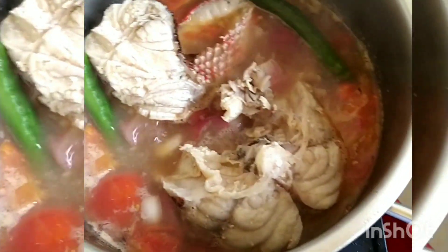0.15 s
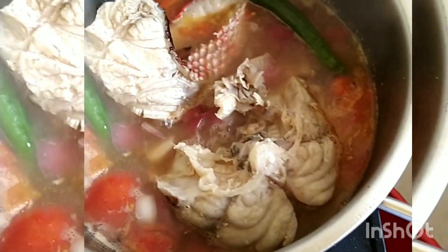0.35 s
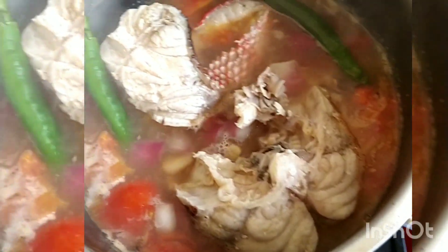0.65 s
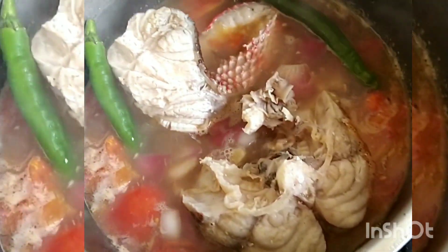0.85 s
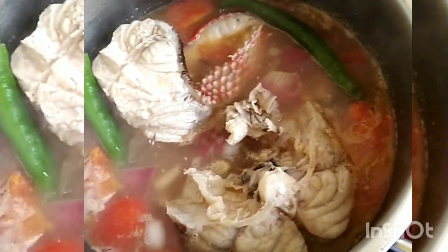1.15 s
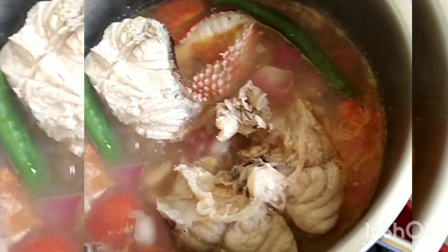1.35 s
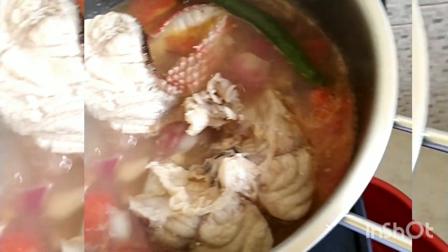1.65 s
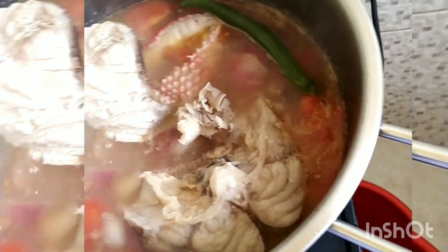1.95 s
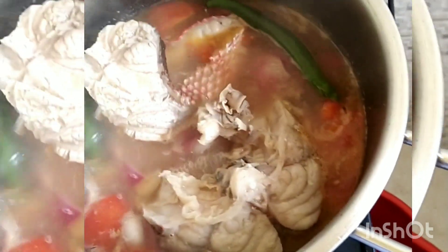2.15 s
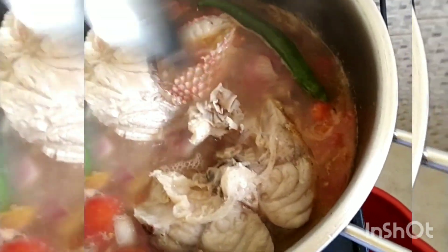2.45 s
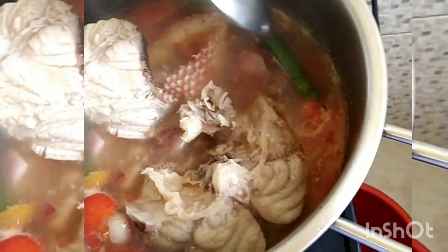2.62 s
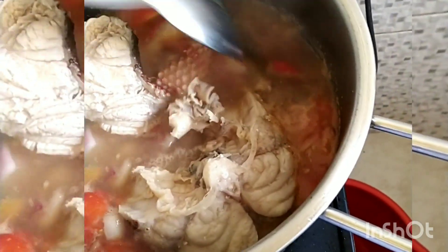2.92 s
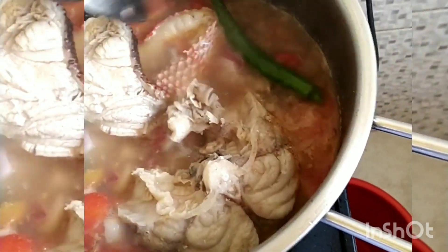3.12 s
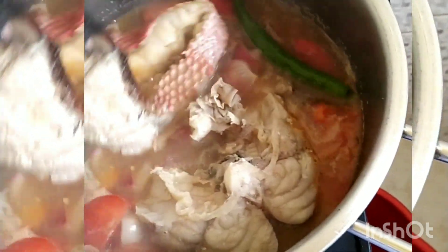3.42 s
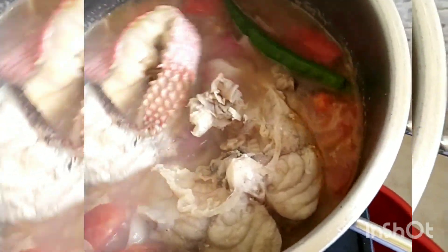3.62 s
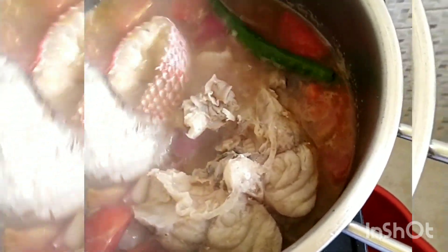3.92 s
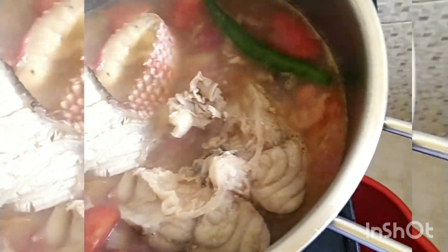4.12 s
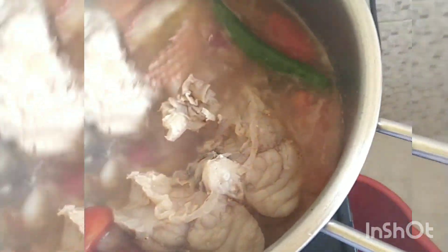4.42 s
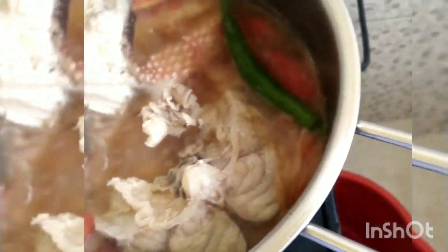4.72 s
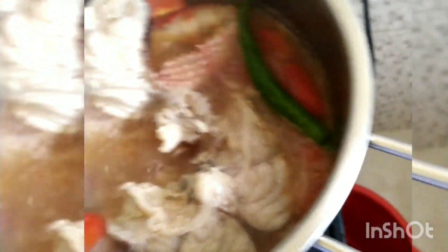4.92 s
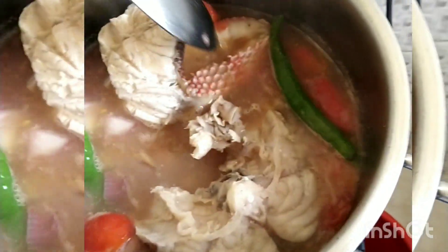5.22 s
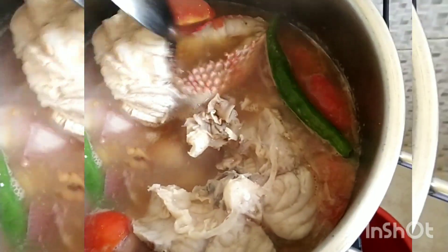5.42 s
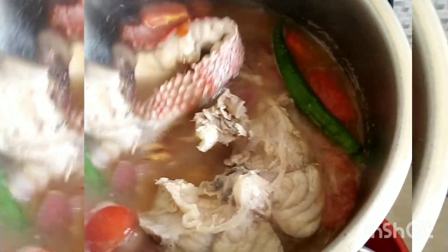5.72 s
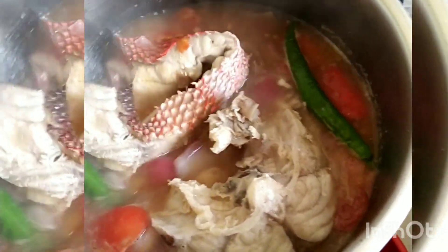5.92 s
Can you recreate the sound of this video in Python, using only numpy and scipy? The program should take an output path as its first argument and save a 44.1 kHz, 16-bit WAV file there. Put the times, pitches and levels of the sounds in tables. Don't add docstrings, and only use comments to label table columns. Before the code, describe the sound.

In a small hard-walled kitchen, a phone an arm or two away picks up a low, faint burner rush, softly bubbling broth and a thin gas hiss throughout. From 0 s bright utensil clinks and dull pot knocks patter, then a loud, clustered lid clang strikes at 0.7 s. Light clinks continue from 1.0 to 1.6 s, followed by a hard spoon blow at 1.65 s, another at 1.94 s, and the heaviest double pan bang at 2.0 s, with a half-second room tail. Between 2.4 and 3.2 s it is quiet, only faint dull taps in the broth. Clinks resume at 3.26 s, with a firm tap at 3.5 s and small ringing tones, through 4.4 s. A big single pot clang hits at 4.6 s. Tiny tinks follow near 5 s, then a sharp clink at 5.26 s and lighter ones until 5.8 s, fading to simmer.

```python
import sys
import numpy as np
from scipy import signal
from scipy.fft import rfft, irfft, next_fast_len
from scipy.io import wavfile
from scipy.ndimage import uniform_filter1d

SR = 44100
rng = np.random.default_rng(int(sys.argv[2]) if len(sys.argv) > 2 else 0)


def volts(x):
    e = np.asarray(x, float) / 20
    return 10 ** e


def generate_wav(signal):
    frames = np.transpose(np.atleast_2d(signal))
    scaled = np.clip(frames, -1, 1) * 32767
    pcm = np.round(scaled).astype(np.int16)
    wavfile.write(sys.argv[1], SR, pcm)


N = 267687
TAIL = 32768
UTENSIL_LAG, POT_LAG = 15, 4
RACK_PAN_DB = 3

# [f/Hz, density/dB per Hz]
LIGHT_STEEL = [(300, -8.5), (1200, -11), (1700, -12), (2100, -2.5), (3200, -8), (5500, -12.5), (7500, 0.5),
               (9800, 6), (12000, -2.5), (14500, -10), (15800, -48.5)]


def unit(x):
    return x / np.sqrt(np.mean(x ** 2) + 1e-20)


def along(points, hz):
    f, v = np.transpose(points)
    return np.interp(np.log(hz + 1), np.log(f + 1), v)


def curve(rows):
    return np.interp(np.arange(N) / SR, *np.transpose(rows))


def pair(mid, side, alike, hz):
    turn = np.arccos(np.clip(along(alike, hz), -1, 1)) / 2
    middle, edge = np.cos(turn) * mid, np.sin(turn) * side
    return np.array([middle + edge, middle - edge])


def noise(gain, alike, patchy_db):
    z = signal.stft(rng.standard_normal((2, N)), nperseg=512)[2]
    patches = uniform_filter1d(rng.standard_normal(z.shape[1:]), 4, 0)
    patches = uniform_filter1d(patches, 10, 1)
    patchy = signal.istft(z * volts(patchy_db * unit(patches)), nperseg=512)[1]
    size = next_fast_len(N + 8192)
    hz = np.fft.rfftfreq(size, 1 / SR)
    mid, side = rfft(patchy, size) * gain(hz)
    return unit(irfft(pair(mid, side, alike, hz), size)[:, :N])


def flame():
    # [t/s, level/dB]
    strength = [(0, -46), (.65, -47.5), (.83, -45), (1.28, -48), (1.5, -47.5), (2.1, -48.5), (2.3, -48.5),
                (3.16, -48.5), (3.55, -47), (3.96, -50), (4.58, -47.5), (5.02, -49.5), (5.7, -48),
                (6.07, -51.5)]
    return curve(strength)


def burner(flame_db):
    # [f/Hz, density/dB per Hz]
    rush = [(15, -81), (25, -46), (57, -14), (178, -7), (271, -9), (300, -7), (884, -11), (1430, -19),
            (1550, -33.5), (1750, -22.5), (2180, -30), (2410, -53), (3000, -54.5), (3900, -69),
            (6600, -120)]
    # [f/Hz, likeness/-1..1]
    rush_alike = [(60, 0.95), (150, 1), (380, 0.8), (940, -0.36), (2370, -0.02), (5940, -0.13),
                  (14900, -0.04)]
    return volts(flame_db - 2.0) * noise(lambda hz: volts(along(rush, hz)), rush_alike, patchy_db=2.0)


def room_boom():
    # [f/Hz, width/Hz, level/dB rms]
    boom = [(71.6, 14, -63), (121.6, 24, -60.5), (172.2, 5.1, -61), (338.7, 16, -62), (479.7, 16, -66.5)]
    out = np.zeros((2, N))
    for centre, width, db in boom:
        out += volts(db) * noise(lambda hz: 1 / (1 + ((hz - centre) / width * 2) ** 2),
                               [(100, 0.93)], patchy_db=-0.5)
    return out


def gas_jet(flame_db):
    # [f/Hz, density/dB per Hz]
    hiss = [(1500, -66), (2200, -19), (4000, -28.5), (7500, -29), (8500, -26), (8900, -9.5), (9800, -3),
            (10700, -13.5), (11200, -29), (14000, -21), (15500, -52)]
    mean_db, swing = -60, 4.9
    level_db = mean_db + swing * (flame_db - flame_db.mean())
    return volts(level_db) * noise(lambda hz: volts(along(hiss, hz)), [(9000, 0.002)], patchy_db=1.5)


def simmer(per_second=60, pitch_hz=550, level_db=-56):
    count = round(per_second * N / SR)
    when = rng.random(count)
    size = np.minimum(rng.exponential(1, count), 3.5)
    side_db = rng.normal(0, 1.4, count)
    hz = pitch_hz * np.exp(.5 * rng.standard_normal((count, 1)))
    cycles = hz * np.arange(2048) / SR
    tones = np.sin(2 * np.pi * cycles * (1 + 0.0068 * cycles))
    pops = tones * np.exp(-cycles / 2.6) * (1 - np.exp(-cycles / 0.7))
    at = (when * N).astype(int)[:, None] + np.arange(2048)
    gains = volts(level_db + 3.2 * size + np.outer([.5, -.5], side_db))
    return np.array([np.bincount(at.ravel(), (g[:, None] * pops).ravel(), N + 2048)[:N] for g in gains])


def causal(gain_db):
    c = irfft(np.log(volts(np.maximum(gain_db, -90))))
    c[1:TAIL // 2] *= 2
    c[TAIL // 2 + 1:] = 0
    return np.exp(rfft(c))


def crack(t60, colour):
    t = np.arange(TAIL) / SR
    burst = rfft(rng.standard_normal(TAIL) * volts(-60 * t / t60))
    size = np.abs(burst)
    chance_db = 20 * np.log10(np.hypot(size, .2 * size.mean()))
    colour_db = along(colour, np.fft.rfftfreq(TAIL, 1 / SR))
    x = irfft(burst * causal(colour_db - chance_db))
    x *= volts(-10 * t / t60)
    return x / np.abs(x).max()


def ring(modes):
    t = np.arange(TAIL) / SR
    onset = 1 - np.exp(-t / 0.001)
    out = np.zeros(TAIL)
    for hz, db, t60 in modes:
        luck, phase = rng.standard_normal(2)
        out += volts(db + 2 * luck - 60 * t / t60) * np.sin(2 * np.pi * hz * t + phase) * onset
    return out


def room():
    # [f/Hz, t60/s]
    decay = [(100, 0.18), (260, 0.66), (700, 0.5), (1840, 0.52), (4850, 0.6), (9000, 0.42), (12800, 0.38)]
    # [f/Hz, likeness/0..1]
    room_alike = [(100, .97), (250, .93), (400, .7), (700, .25), (1500, .15), (15000, 0)]
    hz, t, z = signal.stft(rng.standard_normal((2, TAIL)), SR, nperseg=256)
    fading = z * volts(-60 * t / along(decay, hz)[:, None])
    tail = signal.istft(fading, SR, nperseg=256)[1][:, :TAIL]
    tail = tail * (1 - np.exp(-(np.arange(TAIL) / SR / 0.00071) ** 2))
    return pair(*rfft(tail), room_alike, np.fft.rfftfreq(TAIL, 1 / SR)) / np.linalg.norm(tail[0])


def standing():
    # [f/Hz, level/dB, t60/s]
    room_notes = [(124, -32.5, .5), (172.2, -33.5, 0.6), (274, -36, 0.53), (334.4, -31.5, 0.53),
                  (403.5, -36, .45), (463, -35, 0.44), (551, -34, 0.4)]
    t = np.arange(TAIL) / SR
    return rfft(sum(volts(db - 18.5 - 60 * t / t60) * np.sin(2 * np.pi * hz * t) for hz, db, t60 in room_notes))


def add(out, s, peak_db, pan_db, room_db, x, lag):
    # [f/Hz, level/dB]
    ports = [(100, -3.5), (300, 1.4), (1500, 3.5), (4000, 0.5), (12000, -0.5)]
    hz = np.fft.rfftfreq(TAIL, 1 / SR)
    side = np.array([[.5], [-.5]])
    late = np.array([[max(lag, 0)], [max(-lag, 0)]])
    direct = volts(np.clip(pan_db, -14, 8) * side) * np.exp(-2j * np.pi * hz / SR * late)
    answer = volts(room_db) * (room() + standing())
    heard = irfft(rfft(x) * volts(along(ports, hz) * side) * (direct + answer))
    heard *= np.cos(np.linspace(0, np.pi / 2, TAIL)) ** .5
    start = round(s * SR)
    out[:, start:start + TAIL] += volts(peak_db) * heard


def clinks(out):
    # [t/s, peak/dB, room/dB, brightness/dB]
    clink_events = [(0.0289, -31, 14.5, -2), (0.3341, -29.5, 11, -3.5), (0.475, -37.5, 14, -4.5),
                    (0.626, -35.5, 10.5, -3), (0.9997, -29, 12, -4.5), (1.1657, -34.5, 8.5, -4),
                    (1.3027, -28.5, 8.5, -2.5), (1.3706, -37, 9, -4), (1.469, -42, -5, -4.5),
                    (1.5, -29.5, 9, -5), (1.5954, -27.5, 12, -2), (2.405, -50, 10.5, 1.5),
                    (2.775, -45, 6.5, 9), (2.836, -45, 13, 12), (3.202, -50, 9.5, 11.5),
                    (3.262, -28, 8, -2.6), (3.5253, -42.5, 15, -8), (3.626, -39, 15.5, -7),
                    (3.7237, -30, 4, -6), (3.8515, -36, 8.5, 29), (3.9761, -28, 11.5, -3),
                    (4.202, -34, 11.5, -3.1), (4.2976, -31, 6.5, -3), (4.4113, -38, 16.5, -8),
                    (4.9334, -41.5, -1, 5), (5.2641, -25.5, 7.5, -1.5), (5.443, -32, 7.5, -5),
                    (5.5486, -35.5, 13.5, -5.5), (5.741, -33.5, 4.5, -8.5), (5.7951, -34, 13.5, -3.5)]
    # [f/Hz, level/dB, t60/s]
    clink_modes = [(2081, 3, 0.026), (2490, -10, 0.18), (2840, -20.5, 0.46), (3590, -15, 0.15),
                   (5030, -2, 0.018), (7650, -7.5, 0.016), (9440, -14, 0.039), (10200, -6, 0.084),
                   (13100, -7, .05)]
    body_db, edge_db = -2.5, 0
    hz = np.fft.rfftfreq(TAIL, 1 / SR)
    for s, db, room_db, bright_db in clink_events:
        tilt = [(3500, body_db - bright_db), (5500, 0.0047), (7500, edge_db + bright_db)]
        colour_db = along(LIGHT_STEEL, hz) + along(tilt, hz)
        modes = [(f * (1 + .03 * rng.standard_normal()), level, t60) for f, level, t60 in clink_modes]
        x = crack(.014, np.transpose([hz, colour_db])) + volts(-23) * ring(modes)
        add(out, s, db, RACK_PAN_DB, room_db, x, UTENSIL_LAG)


def dull_contact(pitch_hz, t60):
    # [f/Hz, density/dB per Hz]
    dull = [(150, -31), (500, -7), (1500, -8.5), (2600, -19), (3500, -21.5), (15000, -30.5)]
    return ring([(pitch_hz, 0, t60)]) + volts(5.0) * crack(.5 * t60, dull)


def knocks(out):
    # [t/s, peak/dB, left-right/dB, pitch/Hz]
    knock_events = [(0.111, -35, .1, 1600), (.116, -39.5, 4, 567), (.128, -46.5, 5, 435),
                    (0.131, -32, -1, 1094), (0.201, -29.5, 7, 1030), (.201, -35, 7, 545),
                    (.2, -32, -5, 2760), (.217, -40, -5, 344.4), (.387, -36, 9, 2720), (.44, -57, -3, 760),
                    (1.02, -54, 7, 1920), (1.12, -44, -12, 784), (1.701, -48, 2.5, 124),
                    (1.942, -30, 8, 1134), (2.051, -40.5, 2, 124), (3.66, -46, -5, 2900),
                    (3.396, -43.5, -3, 1267), (4.602, -49.5, 1.5, 167), (5.901, -48.5, 2, 1730),
                    (2.045, -43, 0, 169.6)]
    longest_t60, damped_hz = 0.14, 800
    for s, db, pan_db, pitch in knock_events:
        t60 = longest_t60 / (1 + (pitch / damped_hz) ** 2)
        add(out, s, db, pan_db, 6.5, dull_contact(pitch, t60), POT_LAG)


def blows(out):
    # [t/s, peak/dB, left-right/dB, crack t60/s]
    blow_events = [(0.6872, -2.5, 0, 0.026), (0.6901, -6, 11.5, 0.0066), (0.6947, -4, 7, 0.015),
                   (.7074, -7, 7, 0.053), (1.5646, -22, -12.5, 0.015), (1.6492, -3, -14, 0.019),
                   (1.6515, -10.5, -9.5, 0.018), (1.9382, -6, -9.5, .007), (2.0101, 2.1, -2, 0.029),
                   (2.0142, -1, -7.5, 0.031), (2.0357, 0.4, 7.5, 0.034), (4.5903, 0.4, 0.7, 0.038)]
    struck = [0, 0, 0, 0, 4, 1, 1, 1, 2, 2, 2, 3]
    # [f/Hz, density/dB per Hz]
    lid = [(88, -49), (150, -56), (300, -14), (653, -8), (800, 4), (1060, -13.5), (1400, -9.5), (2050, 0.5),
           (2700, -11.5), (3900, -6), (5800, -11), (10000, 1.5), (13600, -12), (15300, -71)]
    spoon = [(88, -39), (150, -14.5), (338, -6.5), (373, -15), (470, -2.5), (926, -13), (1210, -7.5),
             (1470, -24.5), (1790, -1.5), (3200, -6.5), (3660, -2.5), (4710, -10), (10000, 0.5),
             (13900, -12.5), (15300, -71)]
    pan = [(47, -62.5), (80, -31), (116, -12.5), (334, -11.5), (690, -5), (919, -19), (1200, -16),
           (1430, -13.5), (2530, -2.5), (3200, -15), (3750, -3), (4450, -17.5), (4900, -11), (10100, -2.5),
           (14000, -18.5), (15300, -54)]
    pot = [(88, -64), (150, -20), (225, -17), (332, -12.5), (508, -3), (549, -1), (706, -8), (824, -5.5),
           (1210, -14), (1310, -7), (2010, -5.5), (3100, -8), (4890, -17), (10000, -10), (13400, -24),
           (15300, -93.5)]
    # [f/Hz, level/dB, t60/s]
    lid_modes = [(803, -3, .09), (1262, -7, .12), (1934, 1, .17), (2107, 3, .17), (2432, -3, .12),
                 (3200, -8, .12), (3748, -9, .15), (4158, -6, .17), (4544, -7, .12), (7105, -7, .14),
                 (7914, -6, .1), (8483, -5, .2), (9697, -3, .12), (10300, -3, .08)]
    spoon_modes = [(466, -8.5, .07), (1214, -1, .08), (1794, -10.5, 0.16), (2480, -7, 0.089),
                   (3531, -8.5, 0.23), (3640, -18.5, .22), (3770, -5, 0.2), (4010, -15.5, 0.16),
                   (5970, 0, 0.074), (6730, -9, 0.025), (7600, 2, .04), (8860, 8, .02), (9450, 5.5, 0.035),
                   (10700, 9.5, 0.031)]
    pan_modes = [(337.5, -12.5, .15), (1180, 1.5, 0.084), (1241, -5.5, 0.13), (1620, -3.5, .12),
                 (2048, -8.5, .03), (2450, -8.5, 0.17), (3686, -4.5, 0.11), (3770, -12, .1),
                 (3900, -7.5, 0.22), (5470, -13, .1), (6670, -9, .08), (7300, -8, .06), (9200, 0, .07),
                 (10150, -3, 0.069)]
    pot_modes = [(342, -13.5, 0.13), (405, -19, 0.18), (476, -22, 0.13), (561.6, -6.5, 0.15),
                 (630, -8, .12), (795, -12.5, 0.25), (1078, -25.5, 0.094), (1158, -0.5, 0.055),
                 (1998, -11.5, 0.14), (2030, -12.5, .1), (2190, -10, 0.093), (2600, -13, 0.082),
                 (3300, -10, 0.085), (2950, -13.5, 0.041)]
    fork_modes = [(7900, -3, .03), (9500, -4, .04), (10400, 0, .04), (12000, 2, .045), (13300, -3, .05)]
    object_room_db = [6, 2, 0.2, -0.6, 5]
    object_ring_db = [-26.5, -25.5, -25.5, -17, -17.5]
    object_lag = [6, 2, 30, -22, 2]
    colours = [lid, spoon, pan, pot, LIGHT_STEEL]
    modes = [lid_modes, spoon_modes, pan_modes, pot_modes, fork_modes]
    for (s, db, pan_db, t60), k in zip(blow_events, struck):
        x = crack(t60, colours[k]) + volts(object_ring_db[k]) * ring(modes[k])
        add(out, s, db, pan_db, object_room_db[k], x, object_lag[k])


def tinks(out):
    # [t/s, peak/dB]
    tink_events = [
        (1.4447, -56),
        (1.4811, -53),
        (4.9331, -57),
        (5.0723, -70),
        (5.1646, -63),
    ]
    # [f/Hz, level/dB, t60/s]
    ladle_modes = [(8700, -8, 0.032), (9200, 9, .05), (10200, -2, 0.058), (12600, -10, .06),
                   (14100, -4.5, .1)]
    for s, db in tink_events:
        add(out, s, db, RACK_PAN_DB, 3, ring(ladle_modes), UTENSIL_LAG)


def taps(out):
    # [t/s, peak/dB, pitch/Hz]
    tap_events = [
        (2.479, -53.5, 660),
        (2.539, -61, 590),
        (2.605, -54.5, 560),
        (2.606, -60, 1014),
        (2.814, -51.5, 930),
        (2.821, -49.5, 514),
        (2.821, -56, 1560),
        (3.165, -57, 653),
        (3.487, -37, 753),
        (3.488, -41, 2020),
    ]
    for s, db, pitch in tap_events:
        add(out, s, db, 0, -6, dull_contact(pitch, .025), POT_LAG)


def pot_tones(out):
    # [t/s, peak/dB, pitch/Hz, t60/s]
    ring_events = [
        (3.04, -62, 2400, .12),
        (3.215, -60, 2050, .06),
        (3.396, -47, 1250, .06),
        (3.415, -53, 1330, .12),
        (3.64, -58, 3050, .12),
        (3.665, -56, 2080, .08),
        (3.67, -57, 2950, .1),
        (3.72, -55, 3000, .06),
        (4.15, -58, 1070, .3),
    ]
    for s, db, pitch, t60 in ring_events:
        add(out, s, db, 0, -2, ring([(pitch, 0, t60)]), POT_LAG)


def scene():
    flame_db = flame()
    contacts = np.zeros((2, N + TAIL))
    for source in (clinks, knocks, blows, tinks, taps, pot_tones):
        source(contacts)
    background = burner(flame_db) + room_boom() + gas_jet(flame_db)
    return contacts[:, :N] + simmer() + background


def starved(x):
    # [f/Hz, level/dB]
    under_neighbours = [(1200, -30), (2000, -8), (2800, -4.5), (4300, -1), (7200, -.5), (8400, -8),
                        (10500, -8), (11500, -1), (14000, -1)]
    # [f/Hz, level/dB per bin]
    faint = [(1500, -140), (2500, -105), (8000, -106), (10800, -112), (11300, -97), (14200, -95),
             (14500, -40)]
    hz, _, z = signal.stft(x, SR, window="cosine", nperseg=2048)
    power = np.mean(np.abs(z) ** 2, 0)
    local = uniform_filter1d(uniform_filter1d(power, size=2, axis=1), size=4, axis=0)
    level_db = 10 * np.log10(np.abs(local) + 1e-20)
    near_db = 10 * np.log10(np.abs(uniform_filter1d(power, size=64, axis=0)) + 1e-20)
    mask_db = np.maximum(near_db + along(under_neighbours, hz)[:, None], along(faint, hz)[:, None])
    wander = uniform_filter1d(rng.standard_normal((len(hz) // 6 + 1, z.shape[2])), size=4, axis=1)
    margin_db = level_db - mask_db - 4.2 * unit(wander)[np.arange(len(hz)) // 6]
    treble_db = 10 * np.log10(power[hz > 3000].sum(0) + 1e-20)
    rise_db = np.diff(treble_db, prepend=0)
    onset = (rise_db > 4) | (np.roll(rise_db, 1) > 11)
    attack = np.where(hz[:, None] > 14400, rise_db > 14, onset)
    keep = np.where(attack, 1, np.clip(margin_db + .5, 0, 1))
    return signal.istft(z * keep, SR, window="cosine", nperseg=2048)[1][:, :N]


def roll_off(x):
    return signal.sosfilt(signal.butter(12, 15480, fs=SR, output="sos"), x)


def record(dry):
    x = signal.sosfilt(signal.butter(3, 52, "high", fs=SR, output="sos"), dry)
    x = x / (1 + np.abs(x / .88) ** 8) ** (1 / 8)
    mix = starved(x)
    return roll_off(mix)


dry = scene()
out = record(dry)
generate_wav(out)
```